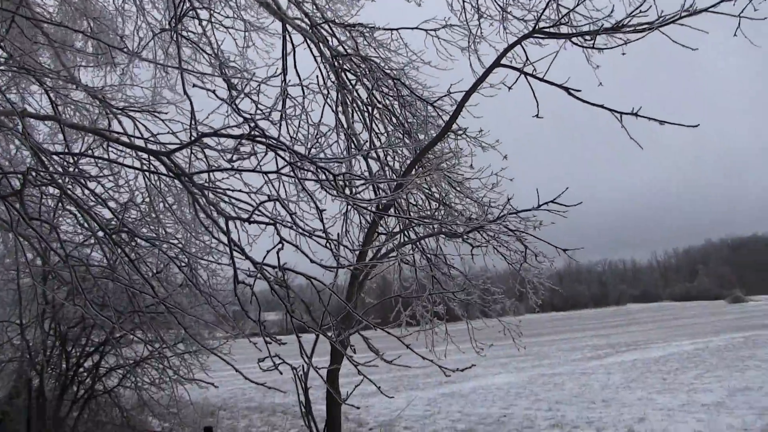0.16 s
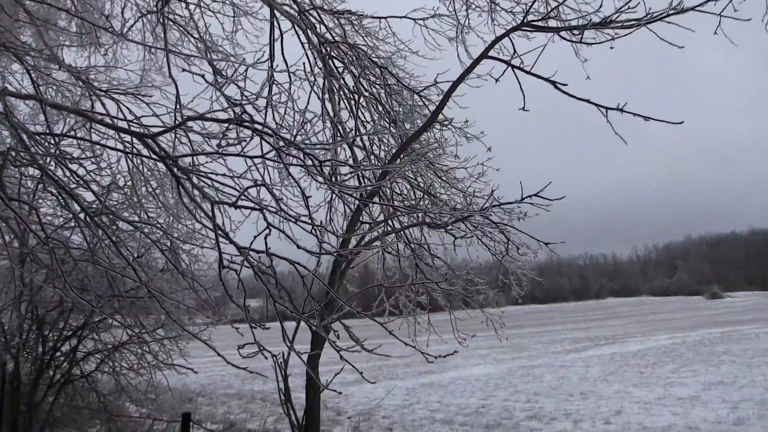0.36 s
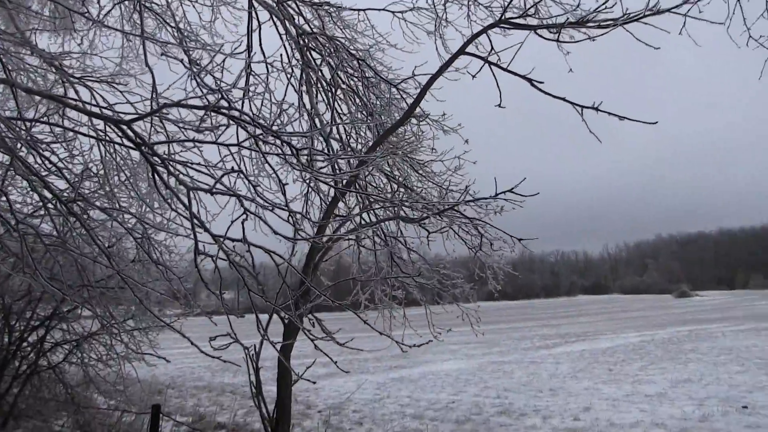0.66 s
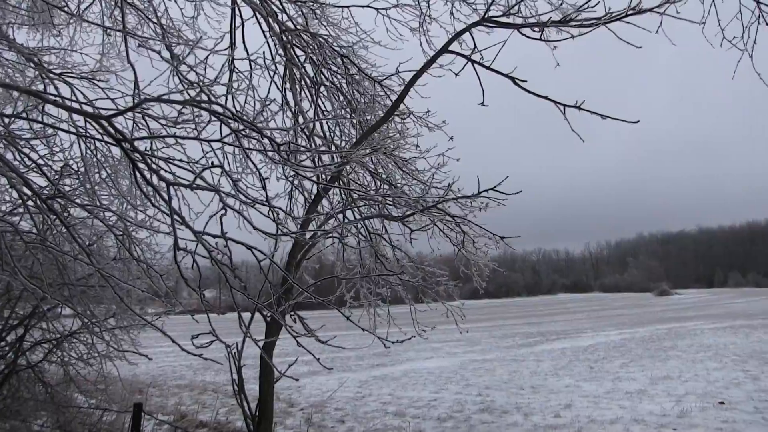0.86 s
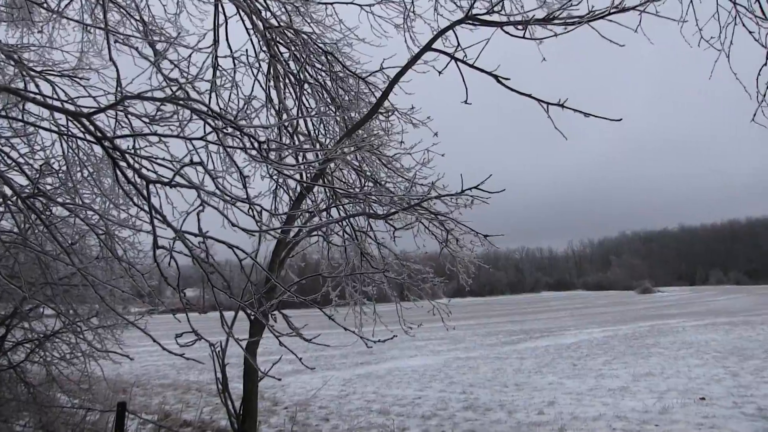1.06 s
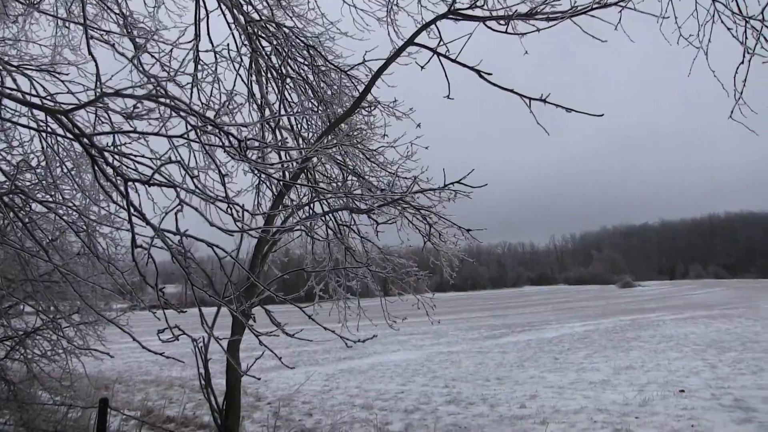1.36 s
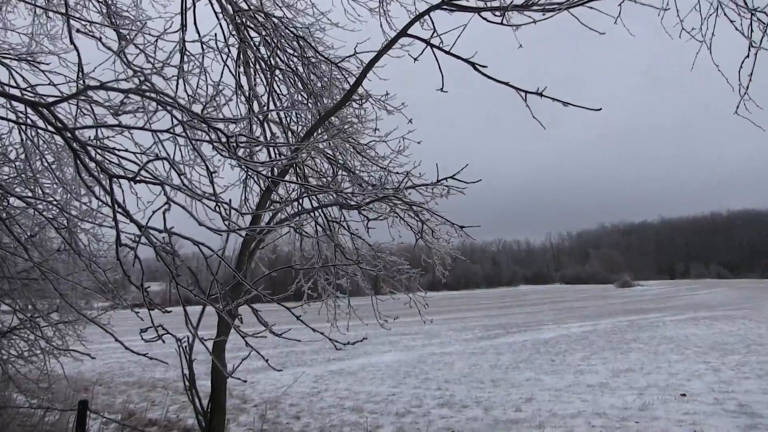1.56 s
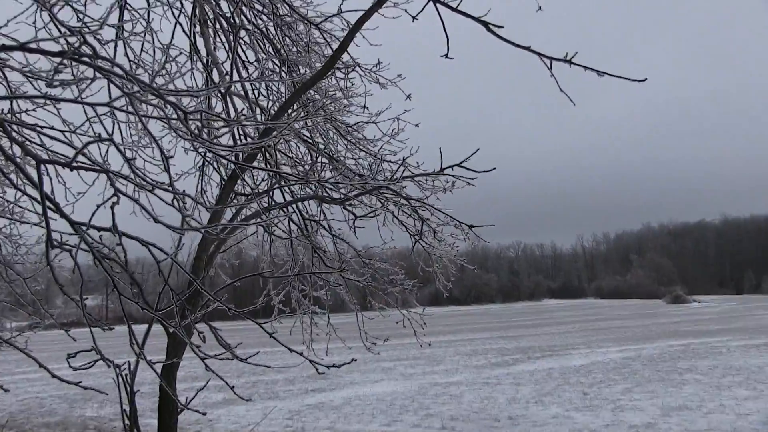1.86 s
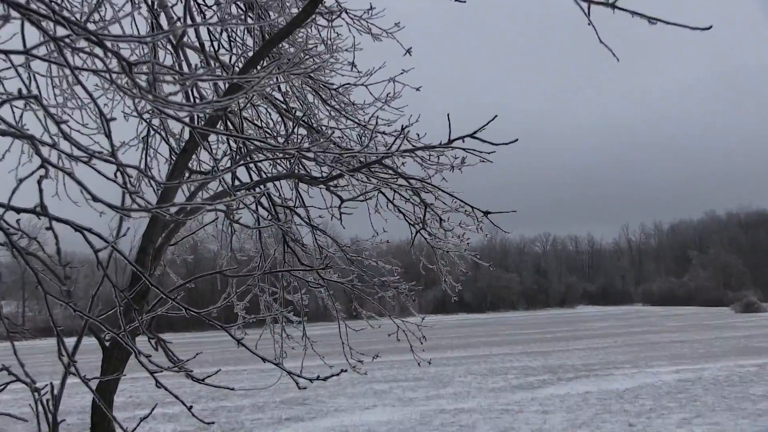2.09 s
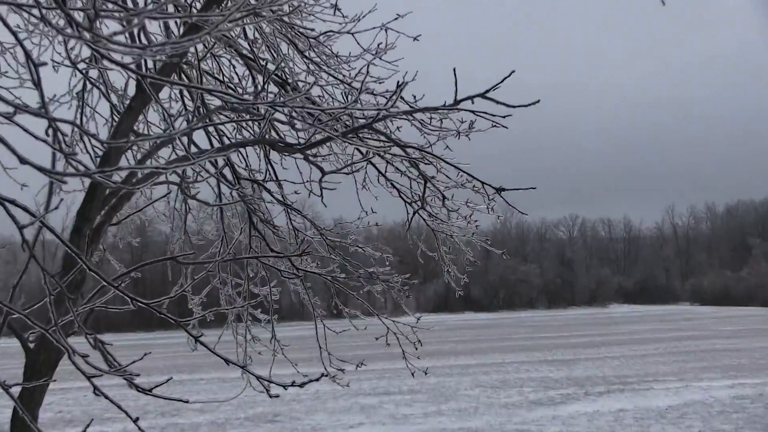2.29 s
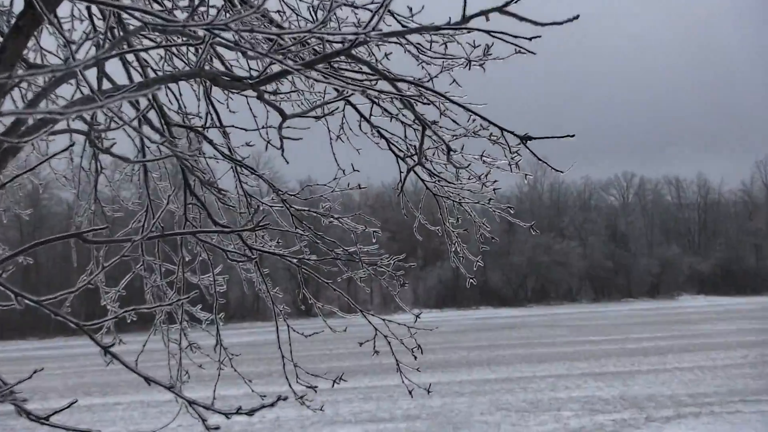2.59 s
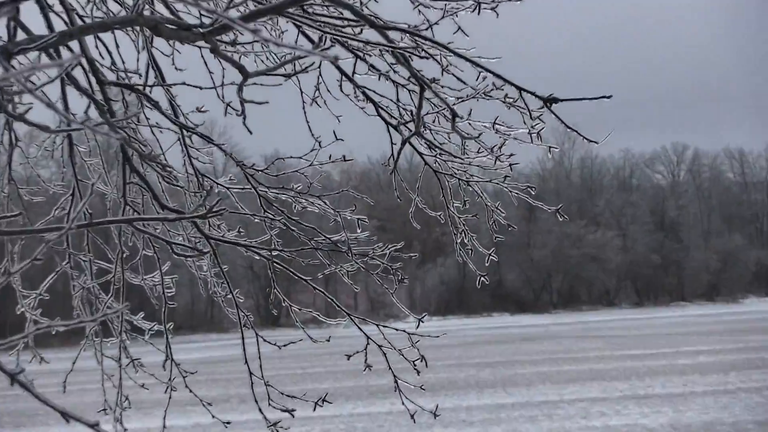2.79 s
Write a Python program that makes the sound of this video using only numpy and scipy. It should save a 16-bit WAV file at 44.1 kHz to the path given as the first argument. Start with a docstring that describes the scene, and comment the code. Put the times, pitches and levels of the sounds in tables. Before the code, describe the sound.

A soft, bright rain hiss runs throughout, with tiny drops ticking on frozen twigs and scattered brittle knocks nearby; deep, uneven wind rumble thumps the outdoor stereo microphone, strongest midway, and the rain thins later.

```python
"""Freezing rain under an iced tree

Freezing rain falls on an ice-coated tree and a crusted field; a hand-held stereo microphone is under the branches.
Far drops merge into a hiss of noise bands, and nearer ones patter as short rings at random times.
The nearest drops and twigs knock and snap one by one: a dry blow, a bright crack, a ring and a scattered tail.
Wind buffets the two microphone ports as low noise, partly in opposite polarity."""
import sys
import numpy as np
from scipy import signal
from scipy.fft import rfft, irfft
from scipy.io import wavfile

SR = 44100
rng = np.random.default_rng(int(sys.argv[2]) if len(sys.argv) > 2 else 0)


def linear_from_db(decibels):
    """Turn decibels (scalar or array-like) into linear amplitude factors; 0 gives 1."""
    return 10 ** (np.asarray(decibels, float) / 20)


def log_audio(samples):
    """Write samples as a 16-bit WAV file to the path given in sys.argv[1]."""
    # one column per channel
    frames = np.atleast_2d(samples).T
    # limit to full scale, then quantise
    limited = np.clip(frames, -1, 1)
    pcm = np.round(limited * 32767).astype(np.int16)
    wavfile.write(sys.argv[1], SR, pcm)


N = 129654

# wind on the ports, sharpness counting against its own mean: time_s, level_db, sharpness_db
WIND_GUSTS = [(0, -14.5, -21.5), (.15, -14, -25.5), (.33, -11.5, -13.5), (.6, -9.5, -21.5),
              (.75, -12.5, -14), (.93, -11, -30), (1.13, -7, -23), (1.33, -8, -32.5), (1.5, -4.5, -30.5),
              (1.7, -9.5, -11.5), (1.95, -12, -13.5), (2.05, -10, -21), (2.2, -14, -7.5), (2.45, -9.5, -18),
              (2.55, -11, -17.5), (2.72, -11.5, -17.5), (2.94, -14, -3)]
# spectrum of the buffeting, relative: frequency_hz, density_db_per_hz
BUFFET_SPECTRUM = [(4.7, -3), (8.0, -9.5), (22, 4.5), (39, -0.5), (83, -12), (200, -28.5), (407, -54.5),
                   (700, -52), (910, -103)]
# share of the wind's power common to both ports (the sign is ignored): frequency_hz, likeness_ratio
WIND_LIKENESS = [(25, -.86), (45, -.62), (90, -.45), (350, -.4), (700, -.1)]
# level of hiss and patter together, with sudden dips and rises: time_s, level_db
RAIN_LEVEL = [(0, -41), (.24, -37.5), (.28, -40.5), (.8, -38.5), (1.22, -36.5), (1.34, -37.5), (1.38, -39),
              (1.5, -37), (1.57, -40.5), (1.63, -39.5), (1.78, -41), (1.94, -39.5), (1.965, -47),
              (2.03, -41.5), (2.08, -40), (2.11, -46.5), (2.22, -44.5), (2.25, -41.5), (2.4, -43.5),
              (2.55, -45.5), (2.82, -42.5), (2.94, -42.5)]
# spectrum of the far hiss, relative: frequency_hz, density_db_per_hz
HISS_SPECTRUM = [(210, 3), (350, -5), (522, -8), (1220, -8), (1940, -9.5), (3230, -7.5), (5060, -5.5),
                 (8310, -15), (12000, -20.5), (14500, -15), (16000, -39)]
# share of the hiss's power common to both ports: frequency_hz, likeness_ratio
RAIN_LIKENESS = [(500, 0.13), (1500, 0.044), (3000, 0.58), (11000, 0.17)]
# colour of hiss and patter between the sides: frequency_hz, left_right_db
RAIN_BALANCE = [(500, 0.5), (750, 2), (1400, 3), (2800, 4), (5500, 1.5), (11000, 2)]
# phase by which the left port leads in the rain: frequency_hz, lead_rad
PORT_LEAD = [(1500, 0), (3000, -.1), (4800, .6), (7300, 2.4), (15000, 6.4)]
# nearest knocks on iced twigs, levels relative: start_s, level_db, pitch_hz, left_right_db, crack_db
KNOCKS = [(0.106, -30.5, 1060, 22, -32), (0.1846, -23, 2100, 23.5, -17.5), (0.1913, -27.5, 3120, -8, -4.5),
          (0.2424, -24.5, 1180, 6, -30), (0.3456, -17, 2830, 11, -26), (0.583, -21, 1240, -1, -28),
          (0.6849, -32, 2050, 21, -14), (0.7773, -19.5, 1240, 9, -25), (1.0571, -15.5, 3040, 10, -29),
          (1.1838, -19, 4100, 10, -26), (1.3169, -28.5, 1240, 22, -12), (1.623, -24, 1290, 15, -30),
          (1.671, -25, 1080, 19, -26), (1.8535, -15.5, 1190, 8.5, -13), (2.432, -28, 1550, 15, -24),
          (2.58, -33, 2530, 19, -18)]
# nearest dry snaps of ice, levels relative: start_s, level_db, centre_hz, left_right_db, crack_db
SNAPS = [(0.8007, -18, 1160, -6, -32), (1.016, -17.5, 2400, 21, -29), (1.1905, -15.5, 1150, 2.5, -37),
         (1.29, -18, 2360, 13.5, -39), (1.3305, -9.5, 3100, 6.5, -33), (1.6205, -21, 4360, 6, -12),
         (1.669, -17.5, 3740, 6.5, -32), (1.781, -21.5, 1560, 14.5, -31), (1.8315, -21, 4630, 3, -31),
         (2.015, -23.5, 4050, 1, -33), (2.2375, -26, 2640, 13, -14), (2.6889, -31.5, 1220, 22, -20),
         (2.791, -20.5, 1410, 4.5, -33), (2.82, -24.5, 3460, 7, -32), (2.881, -28, 1830, 3, -30)]


def rms_one(x):
    """Scale to unit rms."""
    return x / np.sqrt(np.mean(x ** 2) + 1e-20)


def in_time(rows):
    """Columns of a table as curves over time."""
    s, *columns = np.transpose(rows)
    return [np.interp(np.arange(N) / SR, s, c) for c in columns]


def at_hz(points, hz):
    """Value of a table on a log-frequency axis."""
    table_hz, values = np.transpose(points)
    return np.interp(np.log(hz), np.log(table_hz), values)


def bin_hz():
    """Frequencies of the whole scene's spectrum, kept above zero for the log axis."""
    return np.maximum(np.arange(N // 2 + 1) * SR / N, 1)


def drift(rate_hz):
    """Slow chance with unit spread: noise through two equal poles at rate_hz."""
    step = 40  # samples between slow values
    r = np.exp(-2 * np.pi * rate_hz * step / SR)
    chance = rng.standard_normal(N // step + 2002)
    slow = signal.lfilter([1], [1, -2 * r, r * r], chance)[2000:]
    return np.interp(np.arange(N) / step, np.arange(len(slow)), rms_one(slow - slow.mean()))


def ring(clicks, hz, cycles):
    """A resonator: a click rings at a pitch and dies by 60 dB in so many cycles."""
    r = linear_from_db(-60 * hz / (cycles * SR))
    w = 2 * np.pi * hz / SR
    return signal.lfilter([0, np.sin(w)], [1, -2 * r * np.cos(w), r * r], clicks + 1e-18)


def bandpass(x, order, low_hz, high_hz):
    """Butterworth band of a signal."""
    return signal.sosfilt(signal.butter(order, [low_hz, high_hz], "band", fs=SR, output="sos"), x)


def panned(x, pan_db):
    """Split between the channels by a left-right difference."""
    return np.array([x * linear_from_db(pan_db / 2), x * linear_from_db(-pan_db / 2)])


def lagged(x):
    """Delay the right port's signal by a phase that depends on frequency."""
    return irfft(rfft(x) * np.exp(-1j * at_hz(PORT_LEAD, bin_hz())), N)


def noise_bands(edges, spectrum, likeness, moving_db):
    """Bands of noise with their own level, movement and likeness: (common, own left, own right)."""
    out, run_in = 0, SR // 2
    white = rng.standard_normal((2, 3, N + run_in))
    for k, (low, high) in enumerate(zip(edges, edges[1:])):
        hz = np.sqrt(low * high)
        # neighbouring bands take different noise
        band = bandpass(white[k % 2], 2, low, high)[:, run_in:]
        alike = np.clip(abs(at_hz(likeness, hz)), 0, 1)
        shares = np.sqrt([[alike], [1 - alike], [1 - alike]])
        out = out + linear_from_db(at_hz(spectrum, hz) + moving_db(hz)) * band * shares
    return out / np.sqrt(np.mean((out[0] + out[1]) ** 2))


def wind():
    """Eddies push one port and pull the other; gusts raise the level and sharpen the buffeting."""
    lump_db, lump_rate_hz, sharp_from_hz, pan_db = 2, 14, 190, -3
    level_db, sharp_db = in_time(WIND_GUSTS)
    lumps = drift(lump_rate_hz)

    def moving_db(hz):
        sharpening = (sharp_db - sharp_db.mean()) / (1 + (sharp_from_hz / hz) ** 2)
        return lump_db * lumps + sharpening

    edges = 6 * 2 ** np.arange(0, 7.6, .5)
    common, left, right = noise_bands(edges, BUFFET_SPECTRUM, WIND_LIKENESS, moving_db)
    return np.array([common + left, right - common]) * panned(linear_from_db(level_db), pan_db)


def hiss():
    """Countless far drops: noise that surges as a whole and flickers band by band."""
    level_db, surge_db, flicker_db = 1.73, 1.2, 1.07  # level before the rain's level curve
    surge = surge_db * drift(40.0)

    def moving_db(hz):
        return surge + flicker_db * drift(44.0)

    edges = 300 * 2 ** np.arange(0, 6, .4)
    common, left, right = noise_bands(edges, HISS_SPECTRUM, RAIN_LIKENESS, moving_db)
    return linear_from_db(level_db) * np.array([common + left, lagged(common) + right])


def patter():
    """Drops land at random in clumps, each ringing a few cycles at one of 24 pitches and its own place."""
    typical_drops_per_s, clump_db, clump_rate_hz = 500, 3.0, 12.0
    spread_db, place_spread_db, ring_cycles = 4, 6.5, 4.6
    level_db, tilt_db_per_octave = -4, 5.5  # level before the rain's level curve
    born = rng.random(N) < typical_drops_per_s * linear_from_db(clump_db * drift(clump_rate_hz)) / SR
    strength = linear_from_db(spread_db * np.minimum(rng.exponential(1, N), 3.5))
    drops = born * strength * rng.choice([-1, 1], N)
    place = rng.normal(0, place_spread_db, N)
    pitches = np.geomspace(700, 13000, 24)
    dealt = rng.integers(0, 24, N)  # which pitch each drop takes
    out = 0
    for k, hz in enumerate(pitches):
        gain_db = at_hz(HISS_SPECTRUM, hz) + tilt_db_per_octave * np.log2(hz / 4000)
        out = out + linear_from_db(gain_db) * ring(panned(drops * (dealt == k), place), hz, ring_cycles)
    return linear_from_db(level_db) * rms_one(np.array([out[0], lagged(out[1])]))


def ticks(rows, blow_db):
    """Each tick is a dry blow, a bright crack and a swelling ring with an overtone, then a scattered tail."""
    tick_db, crack_gain_db = -6, 30  # added to the tables' levels
    overtone_ratio, overtone_db = 2.04, -23.5
    crack_t60_s, crack_high_hz = 0.007, 5500
    blow_span = 1.8  # the blow spreads over this ratio either side of the pitch
    scatter_db, scatter_t60_s = -8.5, 0.052  # the tick thrown back by twigs and crust
    out, size = np.zeros((2, N + SR)), SR // 16
    t = np.arange(size) / SR
    click = 1. * (t == 0)
    chance = rng.standard_normal((len(rows), 3, size))
    for (start_s, level_db, hz, pan_db, crack_db), noise in zip(rows, chance):
        cycles = 6.5 * np.sqrt(hz / 1000)  # higher pitches ring for more cycles
        # two equal resonators in series make the ring swell before it dies
        main, overtone = [ring(ring(click, f, cycles), f, cycles) for f in (hz, overtone_ratio * hz)]
        body = main / abs(main).max() + linear_from_db(overtone_db) * overtone / abs(overtone).max()
        burst = click + noise[0] * linear_from_db(-60 * t / crack_t60_s)
        crack = bandpass(burst, 1, hz / 2, crack_high_hz)
        crack = crack / np.linalg.norm(crack)
        blow = bandpass(click, 2, hz / blow_span, min(hz * blow_span, SR / 3))
        blow = blow / abs(blow).max()
        direct = body + linear_from_db(blow_db) * blow + linear_from_db(crack_gain_db + crack_db) * crack
        # separate noise for each side scatters the tick
        echoes = noise[1:] * linear_from_db(scatter_db - 60 * t / scatter_t60_s)
        tail = signal.fftconvolve(echoes, direct[None] / np.linalg.norm(direct))[:, :size]
        i = int(start_s * SR)
        out[:, i:i + size] += linear_from_db(level_db + tick_db) * (direct + tail) * panned(np.ones(1), pan_db)
    return np.array([out[0, :N], lagged(out[1, :N])])


def knocks():
    """Knocks on iced twigs: the pitched ring stands above the dry blow."""
    return ticks(KNOCKS, blow_db=-8.0)


def snaps():
    """Dry snaps of ice: the blow, spread wide around its centre, stands above the ring."""
    return ticks(SNAPS, blow_db=7.0)


def scene():
    """Rain, with hiss and patter coloured a little differently on each side, under the wind."""
    rain_level_db, = in_time(RAIN_LEVEL)
    sides = panned(0.97, at_hz(RAIN_BALANCE, bin_hz()))
    rain = irfft(rfft(hiss() + patter()) * sides, N)
    return linear_from_db(rain_level_db) * rain + knocks() + snaps() + wind()


def band_limit(x):
    """A steep low-pass at the top of the band."""
    return signal.sosfilt(signal.butter(12, 16510, fs=SR, output="sos"), x)


def record(dry):
    """Peaks are rounded softly towards full scale, then the microphone's top falls away."""
    rounded = np.tanh(dry)
    top = signal.butter(4, 13150, fs=SR, output="sos")  # low-pass corner in Hz
    return band_limit(signal.sosfilt(top, rounded))


dry = scene()
out = record(dry)
log_audio(out)
```